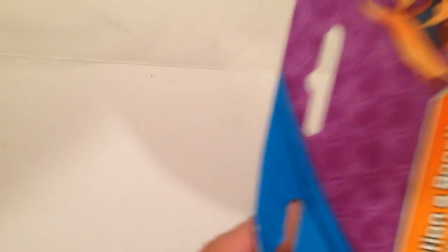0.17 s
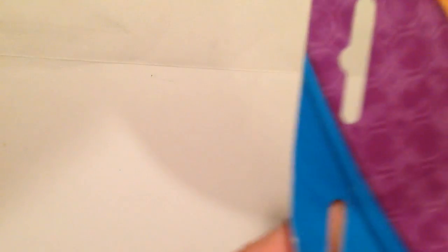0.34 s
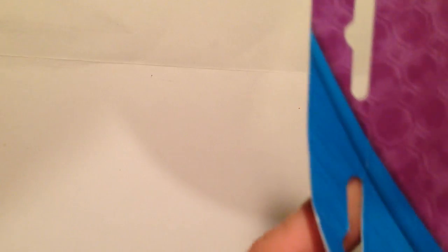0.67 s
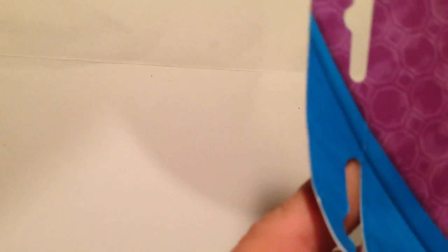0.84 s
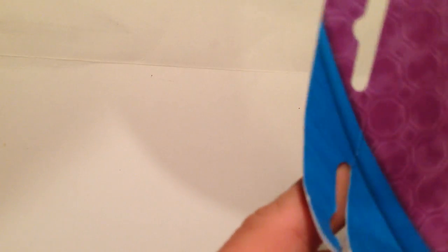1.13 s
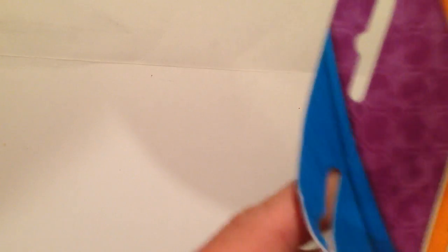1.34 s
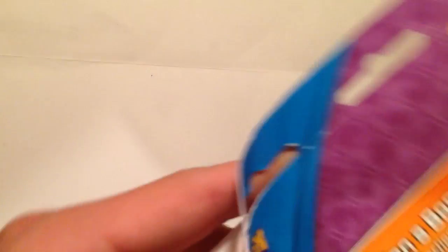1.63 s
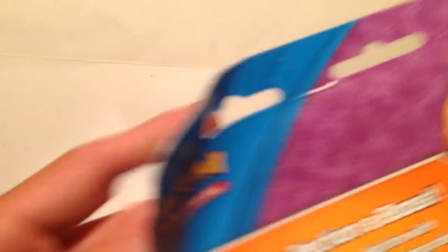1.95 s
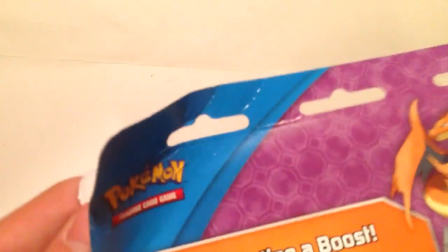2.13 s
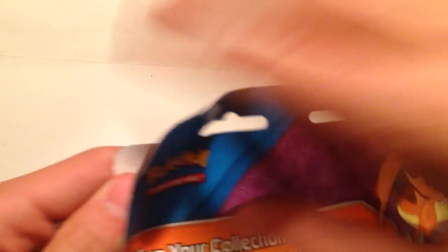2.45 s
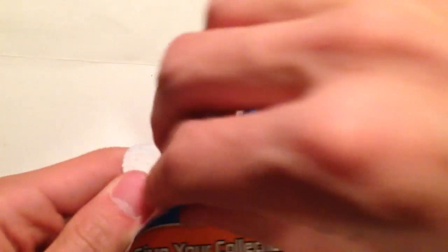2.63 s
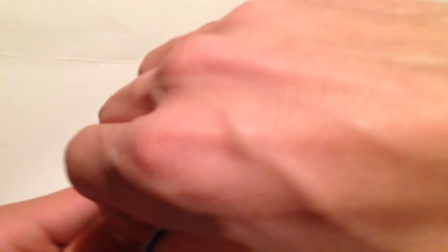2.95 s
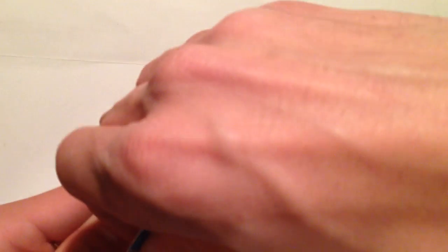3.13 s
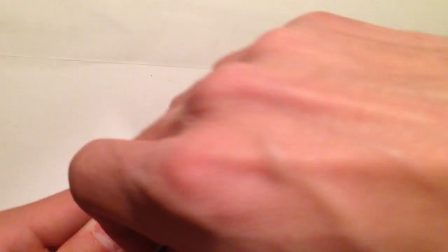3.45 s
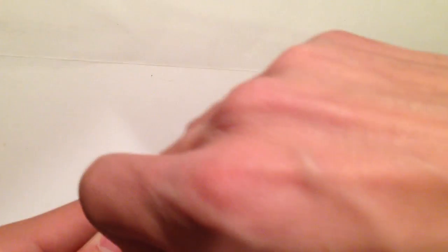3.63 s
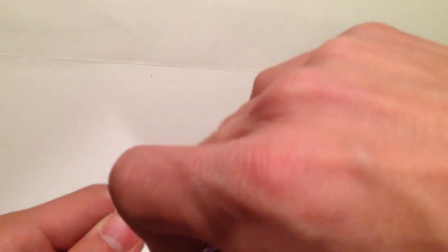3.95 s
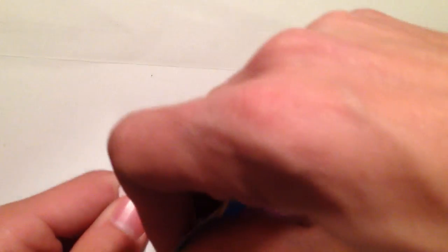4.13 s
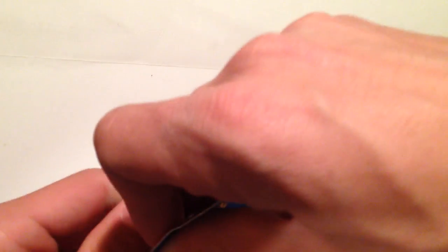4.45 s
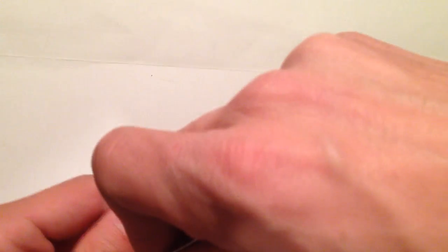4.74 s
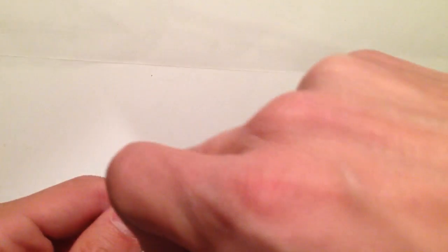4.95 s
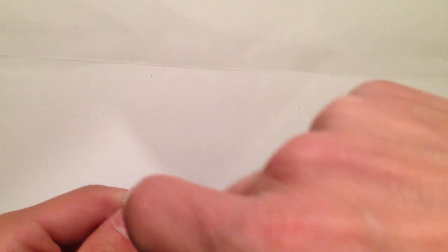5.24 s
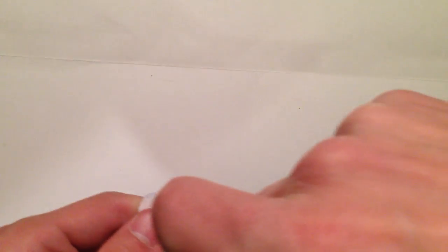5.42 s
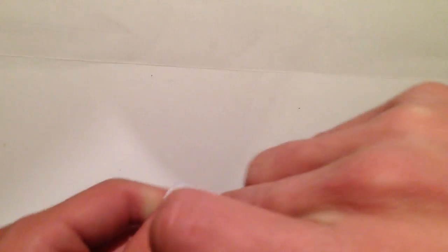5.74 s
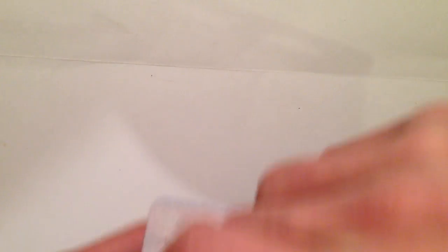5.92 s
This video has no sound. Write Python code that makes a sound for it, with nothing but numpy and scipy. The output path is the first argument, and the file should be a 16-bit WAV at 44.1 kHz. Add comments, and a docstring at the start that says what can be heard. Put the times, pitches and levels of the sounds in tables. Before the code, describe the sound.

Hands handle a stiff card and plastic blister pack, with dry knocks, sharp snaps and crackling tears, close up in a quiet small room.

```python
"""Fingers slide on stiff card in a quiet small room, close to the microphone, over hum, rumble and hiss.
A card-and-plastic blister pack is handled and torn open by hand: dry snaps and dull knocks come
first, then paper fibres part in dense crackles during five pulls, with a faint rubbing squeak.
Friction is filtered random grains, a buckling card is struck damped modes, a snap is a click with
a few rough cycles, and squeak and hum are narrow-band noise; decaying noise gives the echoes."""
import sys
import numpy as np
from scipy import signal
from scipy.fft import rfft, irfft
from scipy.io import wavfile

SR = 44100
rng = np.random.default_rng(int(sys.argv[2]) if len(sys.argv) > 2 else 0)


def store_pcm(level_fs):
    """Save levels as 16-bit WAV."""
    pcm = np.round(np.clip(level_fs, -1, 1) * 32767).astype(np.int16)
    wavfile.write(sys.argv[1], SR, np.atleast_2d(pcm).T)


N = 268126   # length in samples

# Sliding friction and the rustle after a knock: f/Hz, relative spectral density/dB
SLIDE_COLOUR = [(120, -49.5), (200, -17), (310, -13.5), (520, -3.5), (780, 2.1), (1100, -2), (1900, -7.5),
                (2500, -11.5), (3300, -13.5), (4500, -27.5), (7200, -24), (9000, -32), (15500, -39)]
# Modes of the plastic bubble: f/Hz, relative level/dB, t60/s
BUBBLE_MODES = [(2920, -5.5, 0.0068), (3224, -8, 0.015), (3620, -15.5, 0.021)]
# Course of each tearing pull: t/s, fibre crackle level/dB, card body level re crackle/dB
TEARS = [
    [(1.04, -82, 14), (1.062, -52, -25), (1.084, -51, -36), (1.228, -37.5, -28), (1.27, -21.5, -19),
     (1.302, -32.5, -11.5), (1.346, -40, -13.5), (1.362, -46, -16), (1.396, -38, -22), (1.47, -67.5, -17)],
    [(3.0, -81, 7), (3.022, -53.5, -7), (3.052, -44, -10), (3.12, -44, -9), (3.238, -44, -11),
     (3.252, -41.5, -10), (3.37, -31, -3.5), (3.452, -39, -1), (3.518, -47, -4.5), (3.55, -61.5, 2)],
    [(3.55, -63, -20), (3.576, -44.5, -0.5), (3.6, -49.5, -8), (3.606, -52.5, 0.5), (3.662, -47.5, -7),
     (3.7, -60.5, 7), (3.746, -34.5, -2.5), (3.828, -35, 0.5), (3.904, -45.5, -8.5), (3.97, -74, -3.5)],
    [(4.64, -75, 3), (4.75, -71.5, -23), (4.85, -59.5, 5), (4.95, -56, -9)],
    [(4.95, -58, -4), (4.966, -51, -6), (5.008, -44.5, -12), (5.018, -45, -16), (5.034, -42.5, -8),
     (5.068, -34, -5.5), (5.158, -35, -6), (5.22, -41, -5), (5.31, -35.5, -6.5), (5.364, -42, -5),
     (5.508, -42.5, -3), (5.518, -46, -0.5), (5.608, -44.5, -6.5), (5.668, -66, 6), (5.7, -72, -2)],
]
# What sets each pull apart: bubble level/dB, share of the card's swing in the bubble (dB per dB),
# fine crackle level re crackle/dB, grain rate/(1/s), smooth noise re grains, pitch of small snaps f/Hz
PULLS = [(2.5, 0.71, -6, 2300, 0.99, 7400), (3.5, 0.1, -2.5, 2800, 0.39, 12000),
         (3.5, 0.8, -1.5, 2000, 0.49, 12000), (6, 0.25, -4, 210, 0.36, 5400),
         (0.3, 0.28, -1.5, 3500, 0.85, 6600)]


def amp(db):
    """Logarithmic level: an amplitude gain is ten to the power of dB / 20."""
    return 10 ** (np.asarray(db) / 20)


def rms_one(x):
    """Mean-square normalization: the signal is scaled to rms 1."""
    return x / np.sqrt(np.mean(x ** 2) + 1e-20)


def colour(x, spectrum, size=2048):
    """Minimum-phase filtering: a folded cepstrum gives a causal response that follows the spectrum."""
    hz, db = np.transpose(spectrum)
    grid = np.maximum(np.arange(size // 2 + 1), .5) * SR / size
    level_db = np.interp(np.log(grid), np.log(hz), db)
    cepstrum = irfft(np.log(amp(level_db)))
    # fold the anticausal half onto the causal half
    cepstrum[1:size // 2] *= 2
    cepstrum[size // 2 + 1:] = 0
    response = irfft(np.exp(rfft(cepstrum)))
    return signal.fftconvolve(x, response)[:len(x)]


def ring(clicks, hz, t60):
    """Damped resonance: a unit click starts a decaying sine of initial height 1 in a two-pole filter."""
    radius = amp(-60 / (max(t60, .002) * SR))
    angle = 2 * np.pi * hz / SR
    poles = [1, -2 * radius * np.cos(angle), radius * radius]
    return signal.lfilter([0, np.sin(angle)], poles, clicks + 1e-18)


def narrow_noise(hz, width_hz):
    """Resonance bandwidth: noise through one damped mode, its decay set by the width; rms 1."""
    t60 = np.log(1000) / (np.pi * width_hz)
    ringing = ring(rng.standard_normal(N + SR), hz, t60)
    return rms_one(ringing[SR:])   # the build-up is dropped


def strike(s, db, modes, scatter_db=2.5):
    """Modal superposition: clicks at times s excite every mode; db(hz) gives the level per click."""
    at = (np.asarray(s) * SR).astype(int)
    out = np.zeros(N)
    chance = rng.standard_normal((len(at), len(modes), 2))
    for k, (hz, mode_db, t60) in enumerate(modes):
        sign = np.sign(chance[:, k, 0])
        level_db = db(hz) + mode_db + scatter_db * chance[:, k, 1]
        clicks = np.zeros(N)
        np.add.at(clicks, at, sign * amp(level_db))
        out += ring(clicks, hz, t60)
    return out


def friction(t, levels_db, spectrum, per_s, spread_db, clump_db, smooth):
    """Stick-slip friction: uneven random grains and smooth noise swell at sudden slips that fade.

    The four levels are for card, bubble, crackle and fine crackle, from the lowest band up."""
    # Band edges between the four: f/Hz
    split_hz = (2400, 4500, 9000)
    count = len(t)
    sizes = amp(spread_db * np.minimum(rng.exponential(1, count), 4))
    signed_sizes = sizes * rng.choice([-1, 1], count)
    grains = signed_sizes * (rng.random(count) < per_s / SR)
    source = rms_one(grains) + smooth * rng.standard_normal(count)

    starts = rng.random(count) < 160 / SR   # 160 slips per second on average
    slips = starts * np.minimum(rng.exponential(1, count), 2.5)
    fade = np.exp(-1 / (.003 * SR))   # time constant 3 ms
    swell_db = clump_db * signal.lfilter([1], [1, -fade], slips)
    body = colour(source * amp(swell_db), spectrum)

    edges = [(split_hz[0], "low"), (split_hz[:2], "band"), (split_hz[1:], "band"), (split_hz[2], "high")]
    out = np.zeros(count)
    for (edge_hz, kind), db in zip(edges, levels_db):
        band = signal.butter(3, edge_hz, kind, fs=SR, output="sos")
        out += rms_one(signal.sosfilt(band, body)) * amp(db)
    return out


def background():
    """Stationary random noise: coloured rumble and hiss, with hum wavering in narrow bands."""
    # Room rumble and hiss: f/Hz, relative spectral density/dB
    floor = [(15, -32), (30, -34.5), (50, 0.5), (100, -4), (190, -2), (300, -11), (800, -15), (1300, -23.5),
             (2200, -27.5), (3200, -27.5), (4300, -31), (9000, -33.5), (15500, -39.5)]
    # Wavering hum: f/Hz, width/Hz, rms level/dB
    hum = [(119.4, 4.3, -59), (60.5, 17, -59), (98, 8.4, -64.5)]
    floor_db = -61   # rms
    settle = 8192   # samples dropped while the filter fills
    noise = colour(rng.standard_normal(N + settle), floor, size=8192)[settle:]
    out = amp(floor_db) * rms_one(noise)
    return out + sum(amp(db) * narrow_noise(hz, width_hz) for hz, width_hz, db in hum)


def sliding():
    """Sliding friction: each slide rises, holds and falls; a hissier one rises faster, with more bubble."""
    # Fingers slide on and bend the card: start t/s, hold t/s, card body level/dB, hiss re card/dB
    slides = [(0.0, 0.011, -48.5, 0), (0.055, 0.017, -76, 19), (0.071, 0.084, -55.5, -6.5),
              (0.155, 0.031, -53, -1.5), (0.223, 0.1, -55, -4.5), (0.4, 0.031, -59, -4.5),
              (0.48, .008, -60, -11), (0.536, 0.011, -50, -11.5), (0.562, 0.038, -63.5, -3),
              (0.722, 0.017, -80, 5), (0.81, 0.02, -53, -23), (1.505, 0.03, -60, -26),
              (1.525, 0.051, -51.5, 2), (1.629, .01, -48.5, -20), (1.666, 0.076, -65, -7),
              (1.744, 0.044, -62, -4), (1.801, 0.1, -58.5, -5), (1.9, 0.018, -47, -16),
              (1.914, 0.056, -46.5, -4.5), (1.991, 0.082, -43.5, -12.5), (2.132, 0.018, -31.5, -19),
              (2.2, 0.063, -57, -15), (2.279, 0.017, -52, -10.5), (2.355, 0.0058, -59.5, 21.5),
              (2.383, 0.0041, -28.5, -13), (2.406, .02, -45, -24), (2.454, .005, -41, -11.5),
              (2.507, 0.033, -59, -30), (2.596, 0.012, -47.5, 1.5), (2.71, 0.014, -57, -12),
              (2.861, 0.012, -48, -12.5), (2.908, 0.02, -60, 1.5), (4.079, 0.031, -48, -10.5),
              (4.115, .05, -72, 6.5), (4.284, 0.046, -65.5, -3), (4.177, 0.11, -82, 9.5),
              (4.409, 0.066, -71, 2), (5.694, 0.032, -57, 1), (5.741, 0.0059, -47.5, 5.5),
              (5.765, 0.066, -44.5, -21), (5.845, 0.054, -61, -9.5), (5.924, 0.024, -52.5, -7.5),
              (5.98, 0.023, -41.5, -18), (6.012, 0.0052, -35.5, -12.5), (6.075, 0.019, -36.5, -19)]
    rise_db_per_s, fall_db_per_s = 900, 550   # the rise holds for 0 dB hiss, just before the hold
    sharpening = 0.7   # dB of rise rate per dB of hiss
    catch_s = 0.014   # the longer before the hold, the steeper the rise
    bubble_db, bubble_follows_hiss, fine_db = -1.5, 0.51, -5
    t = np.arange(N) / SR
    power = np.full((4, N), 1e-12)
    for s, hold, db, hiss_db in slides:
        near = slice(max(int((s - .1) * SR), 0), int((s + hold + .2) * SR))
        before = np.maximum(s - t[near], 0)
        after = np.maximum(t[near] - s - hold, 0)
        rise_rate = rise_db_per_s * amp(sharpening * hiss_db)
        shape = -rise_rate * before * (1 + before / catch_s) - fall_db_per_s * after
        balance = [[0], [bubble_db + bubble_follows_hiss * hiss_db], [hiss_db], [hiss_db + fine_db]]
        power[:, near] += amp(db + shape + balance) ** 2
    levels_db = 10 * np.log10(power)
    return friction(t, levels_db, SLIDE_COLOUR, per_s=4000.0, spread_db=3.7, clump_db=3.9, smooth=0.71)


def snaps():
    """Impulsive fracture: a dry click and a few rough cycles at its own pitch; the bubble rings along."""
    # Single fibres and glue spots snap: t/s, level/dB, f/Hz, bubble level re snap/dB
    single_snaps = [(0.0267, -28, 7310, -22), (0.0444, -30.5, 7800, -36), (0.06, -37, 8090, -25),
                    (0.7193, -47, 7210, -24), (0.8868, -32, 7400, -37), (0.9335, -46, 7340, -17),
                    (0.9696, -48, 7380, -29), (0.9774, -45, 7530, -31), (0.9955, -40, 7900, -34),
                    (1.0044, -38, 7360, -30), (1.0108, -34.5, 7200, -18), (1.0617, -30, 6920, -21),
                    (1.0772, -21, 7200, -11), (1.0985, -18.5, 8050, -32), (1.1022, -21, 6800, -29),
                    (1.126, -28, 8300, -29), (1.133, -22, 7360, -26), (1.1414, -23, 7900, -34),
                    (1.1704, -22, 7560, -36), (1.2023, -14.5, 7550, -53.5), (1.2235, -21.5, 8100, -30),
                    (1.2467, -12, 7400, -21), (1.2694, -22, 7820, -21), (1.3198, -20, 7140, -24),
                    (1.3415, -16, 7600, -21), (1.3773, -23, 7350, -11), (1.3885, -26, 8750, -25),
                    (1.3949, -19, 7900, -7.5), (1.5244, -24, 5480, -7), (1.7619, -27, 6060, 0),
                    (2.1318, -24, 5500, -21), (2.355, -26, 6010, 3.5), (2.38, -15, 5060, -2.5),
                    (2.4588, -23, 5600, -10), (2.554, -44, 6270, 3), (2.5723, -41.5, 6000, 15),
                    (2.59, -36, 5380, -16), (2.598, -32, 5100, -15), (3.0228, -38, 6050, 16.5),
                    (3.0484, -35, 7050, 2), (3.0685, -25, 5540, -4), (3.0844, -30, 7800, -15),
                    (3.1172, -23, 8380, 1), (3.1344, -24, 8010, -13), (3.255, -14, 8800, -29),
                    (3.2857, -12, 9050, -21), (3.3313, -16, 8260, -12), (3.342, -13, 8400, -19),
                    (3.4286, -22, 5210, -5), (3.46, -22, 8300, -9), (3.5128, -22, 6800, -13.5),
                    (3.56, -27, 14400, -21), (3.5773, -33, 5300, -20), (3.5873, -18, 14300, -23),
                    (3.5948, -28, 9100, -14), (3.6274, -20, 14300, -21), (3.6564, -27, 7100, -20.5),
                    (3.724, -19.5, 13200, -15), (3.7307, -19, 12400, -6), (3.7439, -14, 14800, -12.5),
                    (3.817, -8.5, 6200, 4), (3.8865, -23, 7260, -20), (3.9037, -20.5, 7170, -25),
                    (3.9172, -22, 12000, -28), (3.9456, -42, 5210, -22), (3.9664, -48.5, 6800, -17),
                    (4.0476, -36, 6900, -5), (4.0738, -28, 6300, -10), (4.1097, -39, 5030, 10.5),
                    (4.5937, -46.5, 5180, 12.5), (4.7097, -52, 7950, -17), (4.7295, -46, 5440, -13),
                    (4.742, -46, 8000, -10), (4.7704, -42, 8100, 1), (4.809, -32.5, 7950, 5),
                    (4.8424, -35, 6760, 4), (4.8535, -33, 6900, 1), (4.8908, -31.5, 5860, -14),
                    (4.9095, -32, 11500, -15), (4.9684, -28.5, 7300, 3.5), (5.0187, -17.5, 8100, -9),
                    (5.0777, -17, 12300, -11), (5.2575, -14, 6560, -23), (5.265, -25, 6760, -19),
                    (5.3911, -21, 6030, -16), (5.449, -21.5, 5130, -8), (5.5004, -27, 5800, -18),
                    (5.5468, -33, 5260, -21), (5.5654, -15, 12800, -11), (5.69, -45, 8670, -14),
                    (5.7414, -16, 5800, -19), (5.8057, -30.5, 5800, 6), (6.0114, -31, 6800, -4),
                    (6.053, -32.5, 5100, -11), (6.0724, -37, 5200, -4)]
    click_db, click_t60_s = -7, 0.0018
    decay_cycles, rise_cycles = 38, 0.9   # cycles for a 60 dB decay; time constant of the rise
    rows = list(single_snaps) + small_snaps()
    length = 256   # samples per snap
    out = np.zeros(N + length)
    t = np.arange(length) / SR
    noise = rng.standard_normal((len(rows), length))
    for (s, db, hz, _), burst in zip(rows, noise):
        roughness = 0.23 * np.cumsum(burst)   # phase wander in rad
        tone = np.sin(2 * np.pi * hz * t + roughness)
        shape = (1 - np.exp(-t * hz / rise_cycles)) * amp(-60 * t * hz / decay_cycles)
        click = amp(click_db - 60 * t / click_t60_s) * burst
        start = int(s * SR)
        out[start:start + length] += amp(db - 1.5) * (tone * shape + click)
    s, db, _, bubble_db = np.transpose(rows)
    out = out[:N] + strike(s, lambda hz: db + bubble_db - 5, BUBBLE_MODES)
    return signal.sosfilt(signal.butter(2, 1800, "high", fs=SR, output="sos"), out)


def knocks(width_octaves=0.4):
    """Buckling: three quick slips excite the card modes near a centre; bubble and whole card ring along.

    A rustle dies away after each buckle."""
    # The card buckles: t/s, level/dB, centre of the ring f/Hz, bubble re knock/dB, low thump re knock/dB
    buckles = [(0.33, -30.5, 970, -21, -12), (0.408, -31.5, 513, -25, -14), (0.415, -28.5, 766, 4, -30),
               (0.483, -36, 940, -6, -27), (0.491, -29.5, 736, 2.5, -26), (0.529, -24, 706, -17, -27),
               (0.541, -34.5, 1260, 14.5, -17), (0.549, -29.5, 634, 1, -11), (0.673, -41.5, 756, -22, -9),
               (0.778, -38, 640, -22, -19), (0.787, -34, 805, -8, -27), (0.792, -34, 810, -3, -10),
               (0.819, -25, 895, -1, -38), (0.927, -28, 800, -35, -6), (1.019, -41, 770, -16, -11),
               (1.037, -30, 830, -7, -31), (1.171, -41, 610, -13, -17), (1.487, -32, 810, -19, -33),
               (1.524, -30, 1500, 2, -7), (1.62, -23.5, 885, -26, -14), (1.73, -34, 1005, -12, -14),
               (1.816, -27.5, 830, -24, -9), (1.821, -33.5, 660, -27, -12), (1.831, -33, 880, -15, -10),
               (1.864, -46.5, 1620, 15.5, 6), (1.916, -20.5, 400, -6, -2), (1.932, -31.5, 1250, -5, -9),
               (2.004, -22.5, 660, -11, -10.5), (2.067, -26.5, 870, -31, -3), (2.081, -30, 780, -21, -14),
               (2.104, -17, 890, -34, -21), (2.132, -14.5, 710, -10.5, -5.5),
               (2.145, -18.5, 905, -25, -20.5), (2.154, -24.5, 794, -6, -17),
               (2.169, -27.5, 880, -12, -23.5), (2.206, -27.5, 720, -23, -25),
               (2.217, -23.5, 850, -26, -21), (2.231, -32, 840, -15, -24), (2.267, -30.5, 890, -14, -27.5),
               (2.274, -36, 1090, -5, -15), (2.354, -33, 744, 0, -0.5), (2.366, -16, 910, -7.5, -15),
               (2.38, -4.5, 755, -21, -9.5), (2.406, -14.5, 920, -5.5, -34), (2.416, -34, 814, -26.5, -19),
               (2.438, -26, 780, -18, -17), (2.457, -12, 770, -11, -37), (2.469, -42, 690, -15, -16),
               (2.487, -29, 800, -18, -33), (2.497, -32.5, 1110, -11, -13), (2.554, -18, 610, -19, -37),
               (2.572, -29, 1010, -7, -13), (2.587, -27.5, 1120, 1, -13), (2.595, -36, 620, -9, -14),
               (2.679, -41, 1000, -6, -11), (2.688, -29.5, 980, -2, -33), (2.706, -30.5, 845, -11, -20),
               (2.824, -36, 910, -20, -24), (2.856, -24.5, 845, -2, -33), (2.874, -30.5, 810, -5, -32),
               (2.921, -38.5, 900, -4, 2), (2.931, -34.5, 870, -6, -12), (2.993, -37, 790, -13, -28),
               (3.11, -28, 1010, -16, -34), (3.411, -31, 1510, -5, -27), (3.458, -33.5, 1530, 12, -34),
               (3.509, -40, 1420, -5, -30), (3.609, -32.5, 1110, 3.5, -8), (3.781, -28, 1290, 3, -29.5),
               (3.816, -13, 1220, 8.5, -52), (3.841, -28.5, 1150, -1.5, -32),
               (4.07, -30.5, 726, 6.5, -14.5), (4.085, -35, 1150, -13.5, -28), (4.291, -41, 635, -10, -30),
               (4.299, -33.5, 1050, 0, -29.5), (4.309, -42, 1093, -3, -25), (4.408, -41.5, 1000, -3, -23),
               (4.61, -47.5, 790, 15, -15), (4.668, -42, 720, -6, -35), (4.692, -36, 670, -0.5, -18),
               (4.758, -37, 690, 3.5, -18), (4.809, -41, 730, -6, -8), (4.85, -34.5, 855, -8, -29),
               (4.876, -29, 764, -15, -48), (4.889, -38, 1490, 9, -23), (4.923, -33, 810, 4, -27),
               (5.137, -27, 1330, 3, -11), (5.565, -32, 1260, -11, -28), (5.69, -35, 1080, -2, -20),
               (5.743, -27.5, 1060, 13, -1), (5.75, -26, 770, -19, -11), (5.763, -24, 970, -3, -28),
               (5.804, -13.5, 1170, -11, -41), (5.821, -26.5, 975, -2, -29), (5.94, -25.5, 690, -8, -15),
               (5.973, -29, 720, -11, -24), (5.982, -21.5, 1040, -2, -35), (6, -24.5, 1020, 3, -38),
               (6.013, -20.5, 1190, 5.5, -45), (6.055, -18, 580, -23, -30), (6.064, -19.5, 1070, -6, -28),
               (6.073, -32, 1120, 8, -27)]
    # Modes of the card: f/Hz, relative level/dB, t60/s
    card_modes = [(407, -8, 0.04), (493, -17, 0.021), (664, -0.5, 0.013), (777, -2, 0.013),
                  (992, -7, 0.022), (1180, 1, 0.0068), (1364, -4.5, 0.0092), (1572, 8, 0.0051),
                  (1712, 3.5, 0.0097), (2032, 14.5, 0.0067)]
    # Modes of the whole card flexing: f/Hz, relative level/dB, t60/s
    thump_modes = [(170, 0.5, 0.043), (237, -8, 0.075), (350, -10.5, 0.013)]
    s, knock_db, centre_hz, bubble_db, thump_db = np.transpose(buckles)

    def near_centre(hz):
        """Selective excitation: a mode weakens with its distance in octaves from the centre."""
        octaves = np.log2(hz / centre_hz)
        return knock_db - 5.5 - np.minimum(5 * (octaves / width_octaves) ** 2, 22)

    gaps_s = 0.001644 * rng.uniform(0.6, 1.501, (len(s), 2))
    second, third = s + np.cumsum(gaps_s, axis=1).T
    card = amp(-5.5) * strike(s, near_centre, card_modes)
    card += strike(second, near_centre, card_modes)
    card += amp(-5.5) * strike(third, near_centre, card_modes)
    # a bending card is no hard contact
    card = signal.sosfilt(signal.butter(2, [330, 2600], "band", fs=SR, output="sos"), card)
    card += strike(second, lambda hz: knock_db + bubble_db - 7.0, BUBBLE_MODES)
    card += strike(s, lambda hz: knock_db + thump_db - 11.0, thump_modes)

    power = np.zeros(N)
    power[(second * SR).astype(int)] = amp(knock_db - 23.5) ** 2
    decay = amp(-120 / (.07 * SR))   # on power, so the rustle falls 60 dB in 70 ms
    dying = np.sqrt(signal.lfilter([1], [1, -decay], power))
    rustle = dying * rms_one(colour(rng.standard_normal(N), SLIDE_COLOUR))
    return signal.sosfilt(signal.butter(2, 130, "high", fs=SR, output="sos"), card) + rustle


def tearing():
    """Fracture noise: parting fibres crackle in the pull's colour; the bubble partly follows the card."""
    # Colours of the pulls (first; second and third; fourth and fifth): f/Hz, relative spectral density/dB
    first_colour = [(240, -56), (400, -23.5), (942, -7), (1360, -17), (1560, -8.5), (2220, -8.5),
                    (2400, -6), (2750, -10), (4290, -14), (4770, -10.5), (6200, -11), (7300, -1),
                    (8300, -5.5), (9800, -8.5), (15500, -10.5)]
    middle_colour = [(240, -47), (400, -25.5), (600, -19), (900, -13), (1150, -15), (1480, -4.5),
                     (1800, -18), (2500, -12.5), (3150, 1), (3750, 0.8), (4300, -12), (5700, -7.5),
                     (6600, -9), (8500, -7), (15500, -9)]
    last_colour = [(240, -49), (400, -27.5), (700, -6), (1120, -5.5), (1530, 0.5), (1900, -8), (2700, -5),
                   (3250, 2.2), (3700, -3), (4200, -12.5), (4950, -2.5), (5800, -7), (7000, -5),
                   (12300, -5), (15500, -9.5)]
    colours = [first_colour, middle_colour, middle_colour, last_colour, last_colour]
    out = np.zeros(N)
    for rows, spectrum, (bubble_db, follows, fine_db, per_s, smooth, _) in zip(TEARS, colours, PULLS):
        s, crackle_db, card_db = np.transpose(rows)
        at = np.arange(int(s[0] * SR), int(s[-1] * SR))
        crackle = np.interp(at / SR, s, crackle_db)
        card = np.interp(at / SR, s, card_db)
        levels = [crackle + card, crackle + bubble_db + follows * card, crackle, crackle + fine_db]
        out[at] += friction(at / SR, levels, spectrum, per_s, spread_db=3.0, clump_db=3.0, smooth=smooth)
    return out


def small_snaps():
    """Random fracture: snap rows scattered along each pull, their level and bubble tied to its course."""
    rate_per_s, pitch_spread_octaves = 110, 0.22
    above_crackle_db, spread_db, bubble_offset_db = 10, 3.5, -2.5
    rows = []
    for curve, (bubble_db, follows, *_, hz) in zip(TEARS, PULLS):
        s, crackle_db, card_db = np.transpose(curve)
        at = rng.uniform(s[0], s[-1], int(rate_per_s * round(s[-1] - s[0], 1)))
        size, pitch, ringing = rng.standard_normal((3, len(at)))
        db = np.interp(at, s, crackle_db) + above_crackle_db + spread_db * np.minimum(size, 1)
        ring_db = bubble_offset_db + bubble_db + follows * np.interp(at, s, card_db) + 4 * ringing
        snap_hz = np.minimum(hz * 2 ** (pitch_spread_octaves * pitch), 15000)
        rows += zip(at, db, snap_hz, ring_db)
    return rows


def squeak():
    """Narrow-band excitation: a finger rubs the gloss, heard as noise in two narrow bands."""
    # Course of the rubbing: t/s, level/dB
    rubbing = [(1.6, -75), (1.63, -63), (1.67, -67), (1.71, -62), (1.76, -64), (1.79, -75)]
    # Bands of the squeak: f/Hz, width/Hz, relative level/dB
    bands = [(1810, 60, 0), (2240, 90, -1)]
    out = sum(amp(db) * narrow_noise(hz, width_hz) for hz, width_hz, db in bands)
    s, db = np.transpose(rubbing)
    return out * amp(np.interp(np.arange(N) / SR, s, db, left=-200, right=-200))


def room(x):
    """Reverberation: table and wall echoes as dulled, decaying noise that starts after 3 ms."""
    t60_s, wall_cut_hz = 0.047, 6700
    t = np.arange(int(.4 * SR)) / SR
    tail = rng.standard_normal(len(t)) * amp(-60 * t / t60_s) * (t > .003)
    tail = signal.lfilter(*signal.butter(1, wall_cut_hz, fs=SR), tail)
    unit_energy = tail / np.sqrt(np.sum(tail ** 2))
    return signal.fftconvolve(x, unit_energy)[:N]


def scene():
    """Linear superposition: pack and hands, their echoes, and the room's background add up."""
    room_db = -15
    pack = sliding() + snaps() + knocks() + tearing() + squeak()
    return (pack + amp(room_db) * room(pack) + background())[None]


def record(dry):
    """Band limiting: the small microphone drops the deep bass; the top is cut."""
    cutoff_hz = 16300   # from here up at least 70 dB down
    thin = signal.sosfilt(signal.butter(3, 42, "high", fs=SR, output="sos"), dry)
    return signal.sosfilt(signal.cheby2(16, 70, cutoff_hz, fs=SR, output="sos"), thin)


dry = scene()
out = record(dry)
store_pcm(out)
```